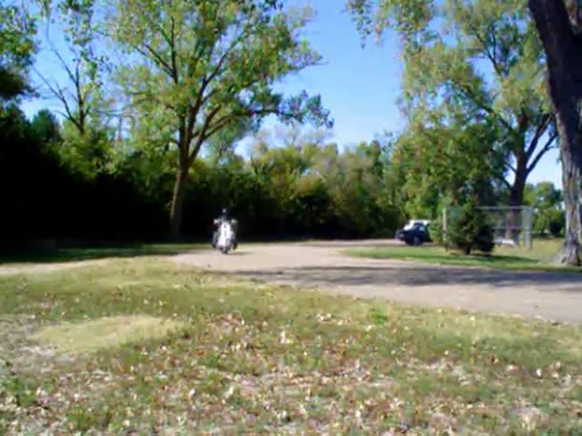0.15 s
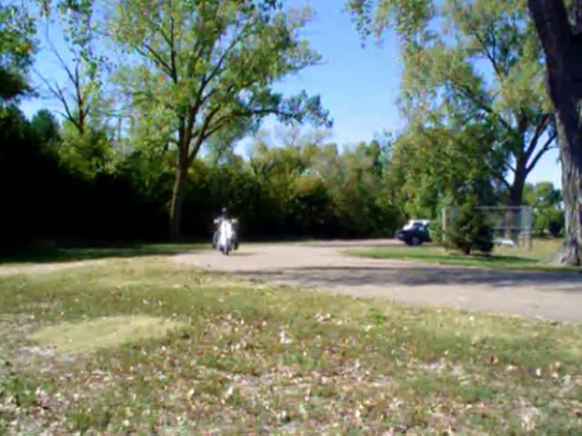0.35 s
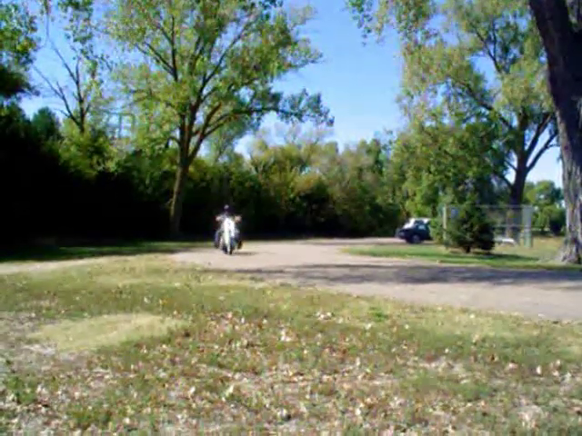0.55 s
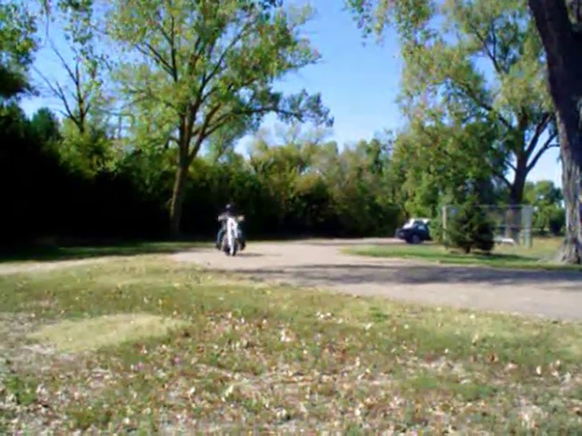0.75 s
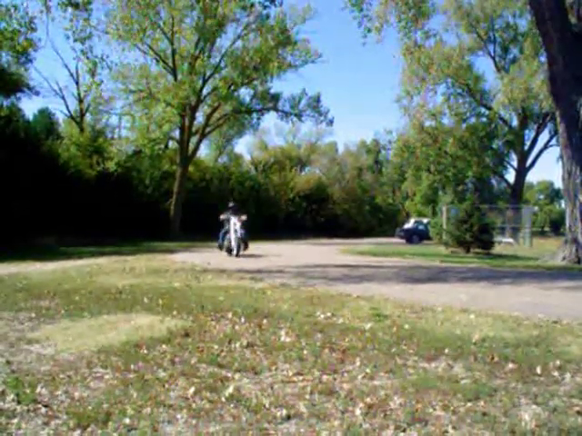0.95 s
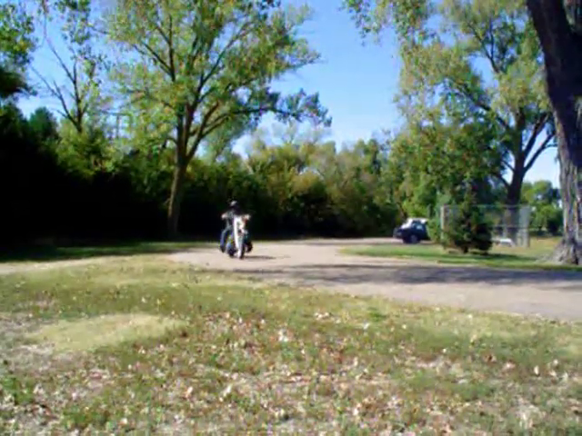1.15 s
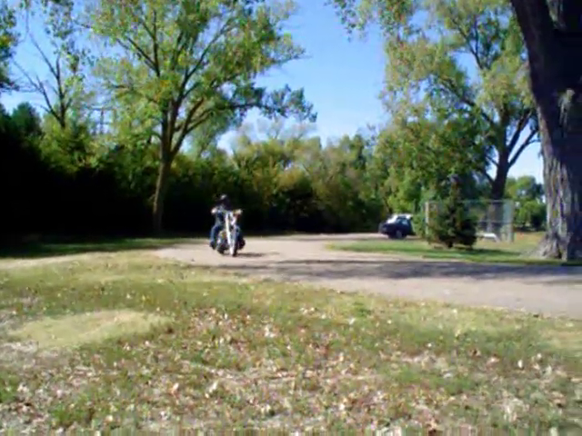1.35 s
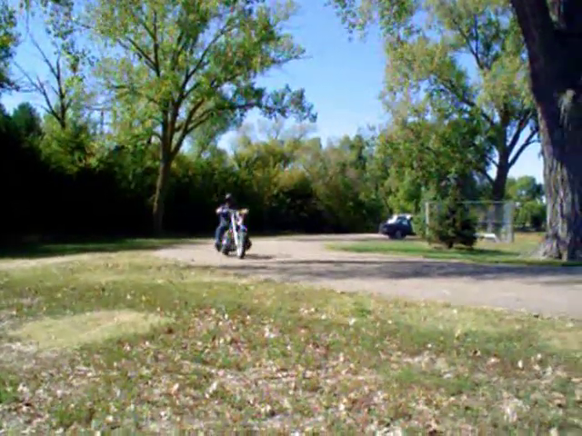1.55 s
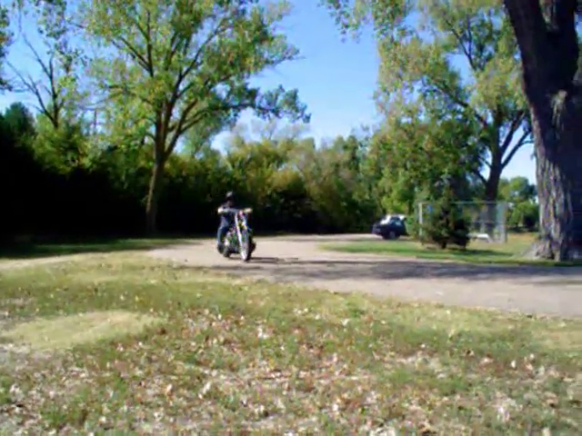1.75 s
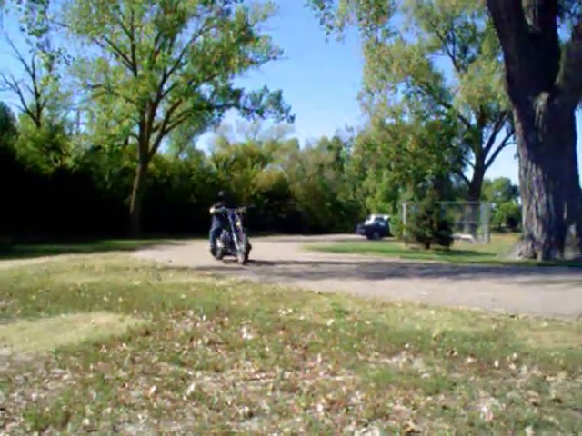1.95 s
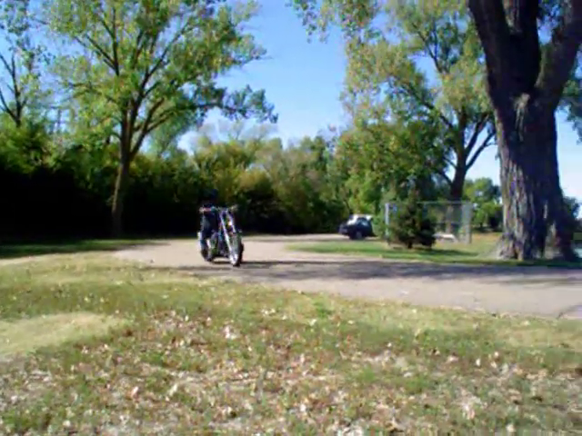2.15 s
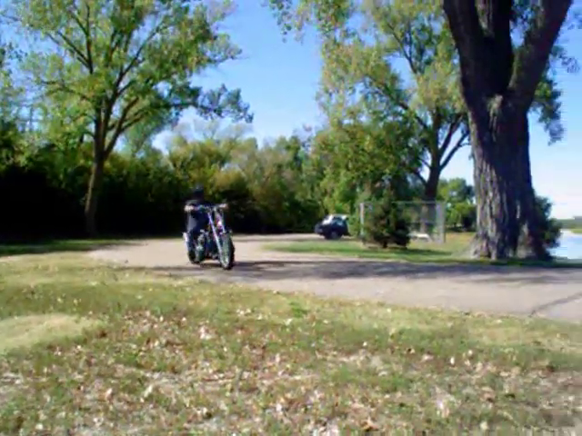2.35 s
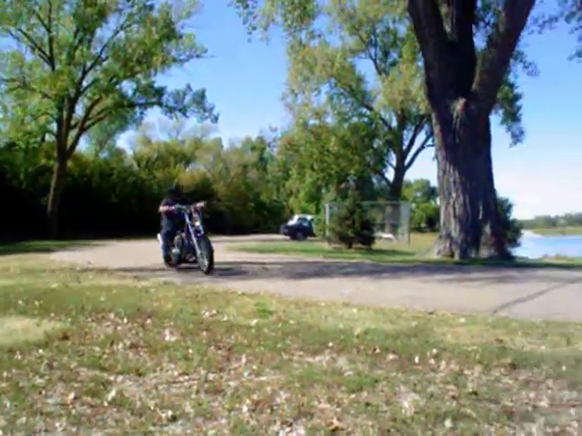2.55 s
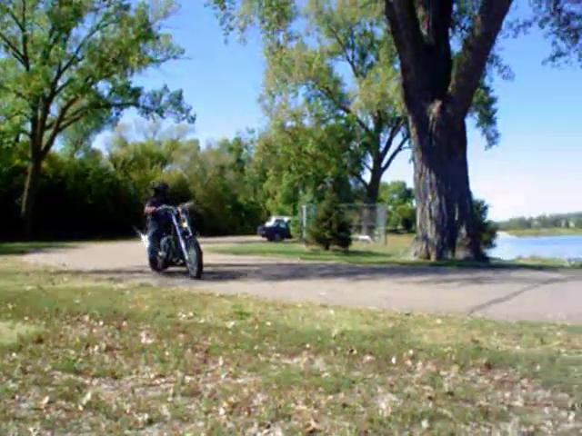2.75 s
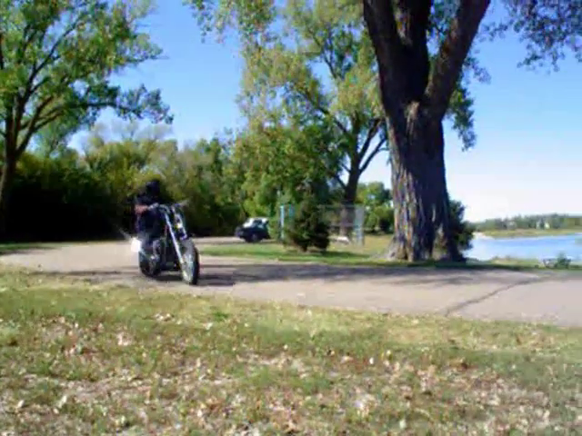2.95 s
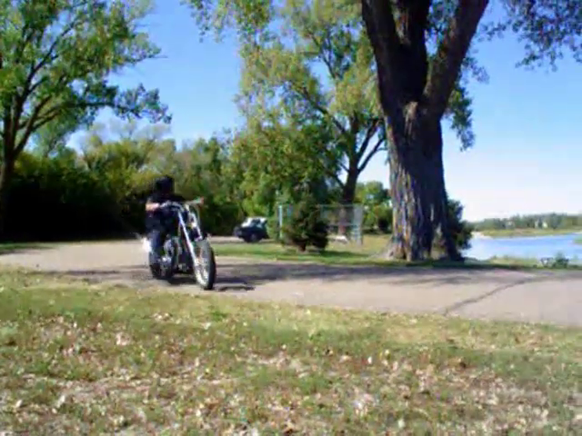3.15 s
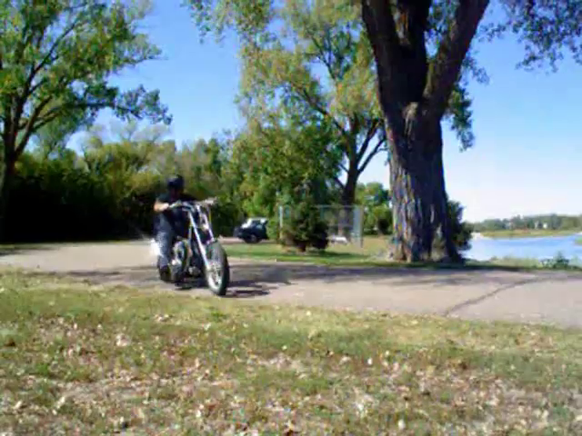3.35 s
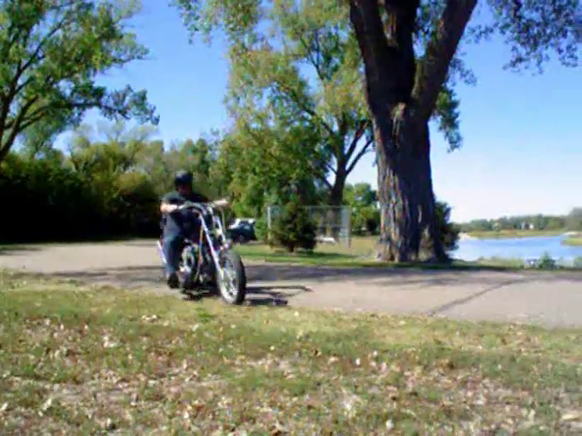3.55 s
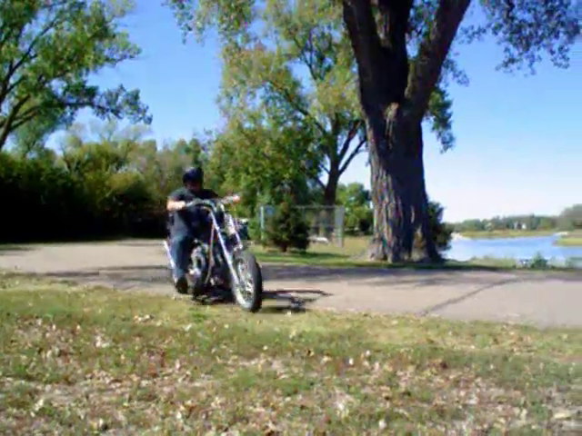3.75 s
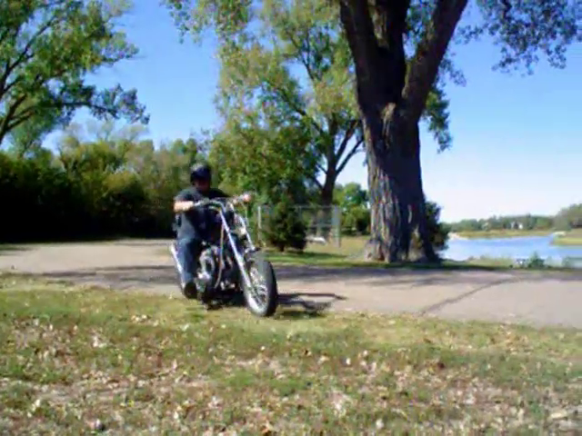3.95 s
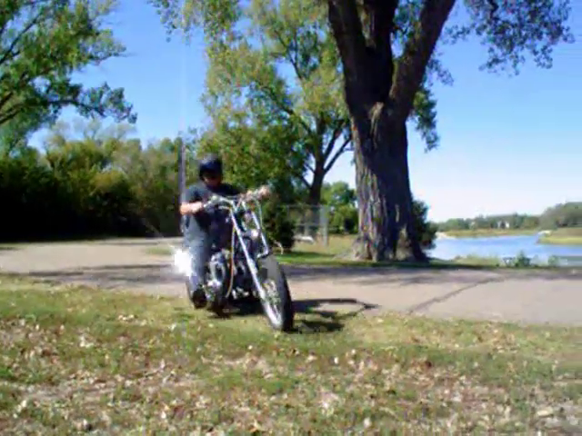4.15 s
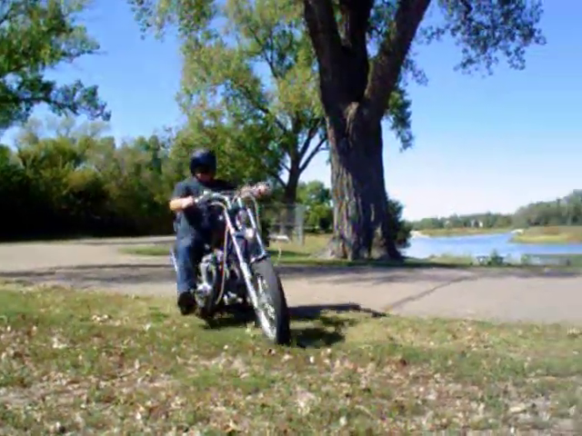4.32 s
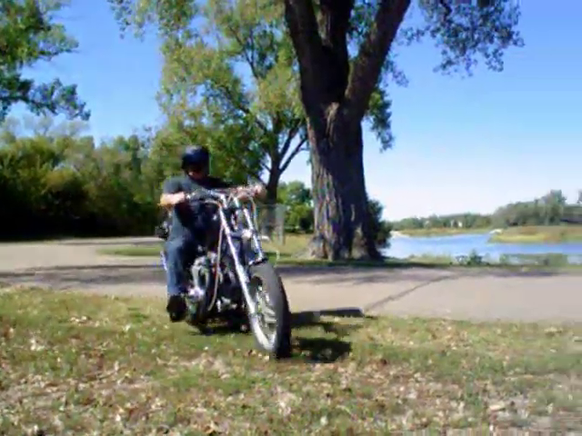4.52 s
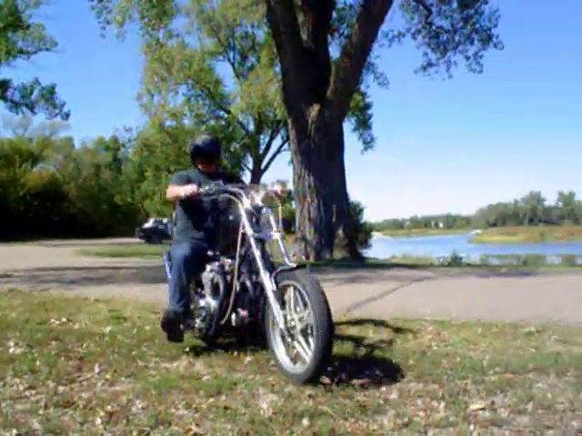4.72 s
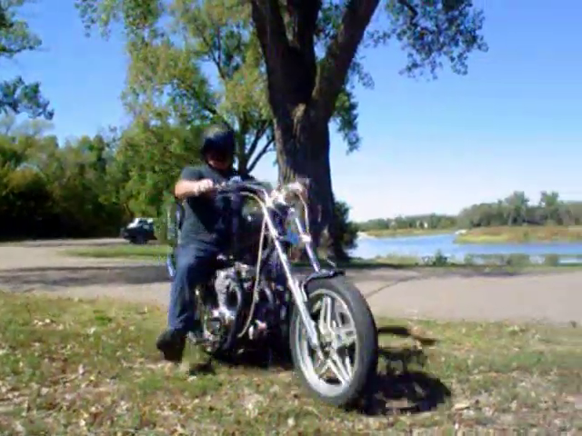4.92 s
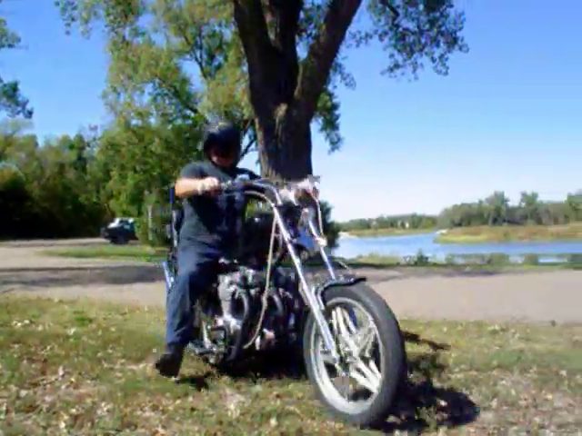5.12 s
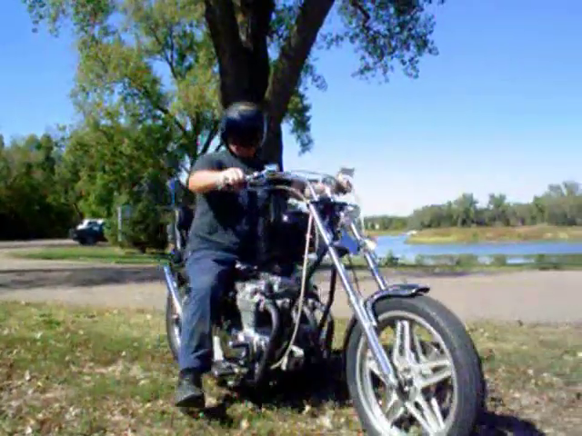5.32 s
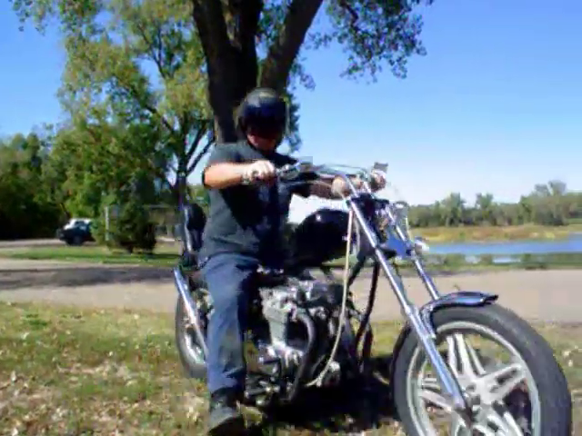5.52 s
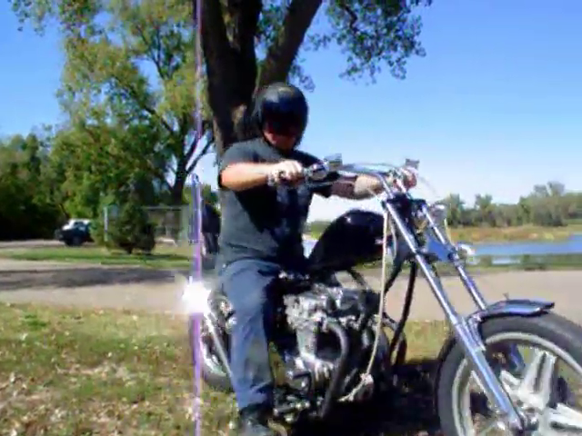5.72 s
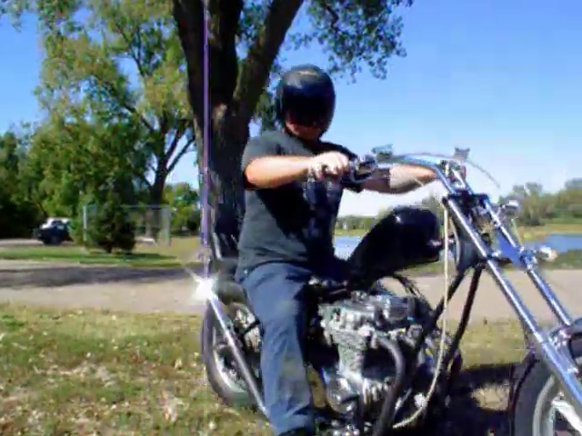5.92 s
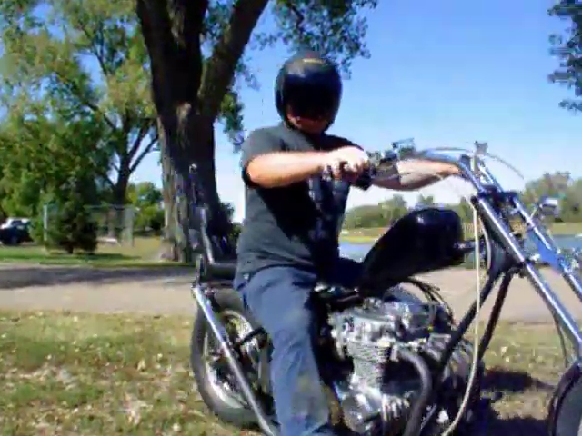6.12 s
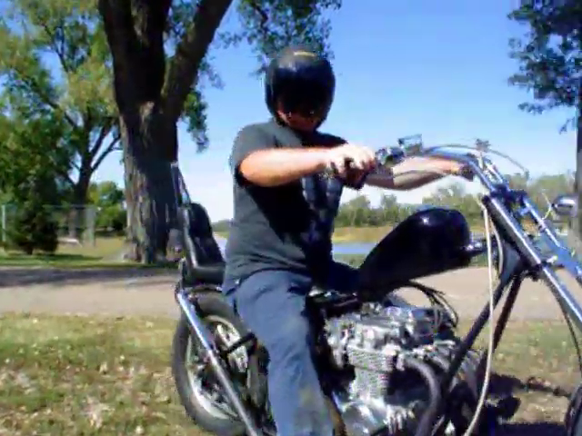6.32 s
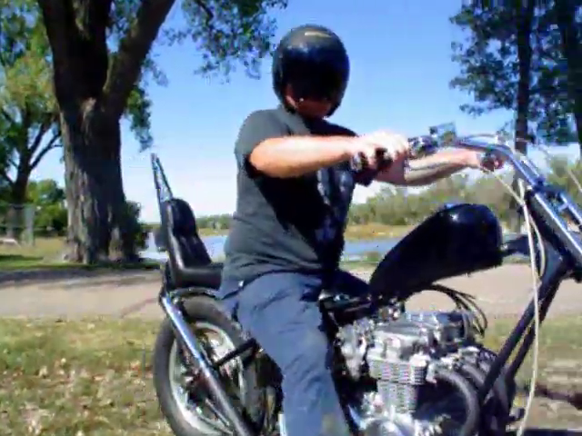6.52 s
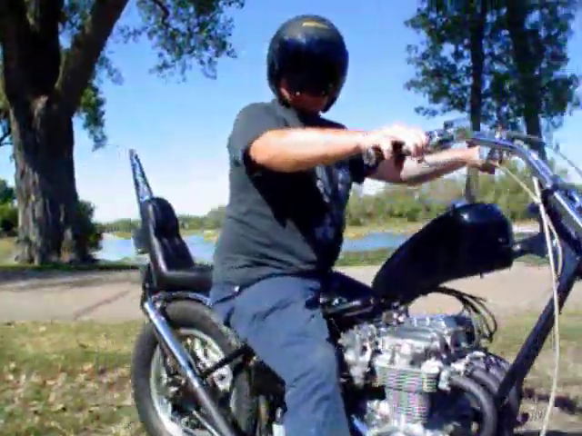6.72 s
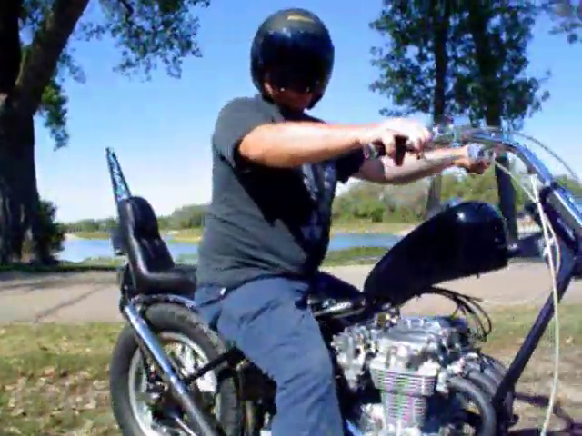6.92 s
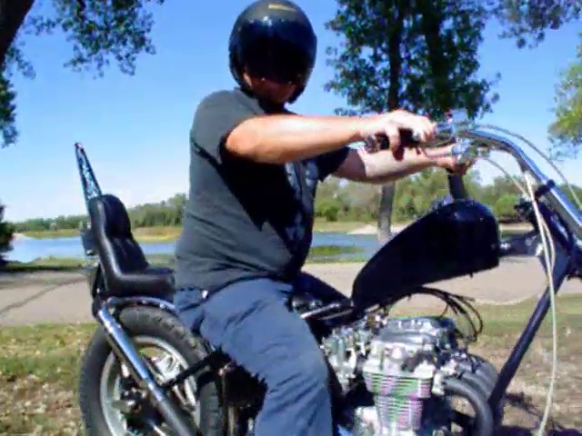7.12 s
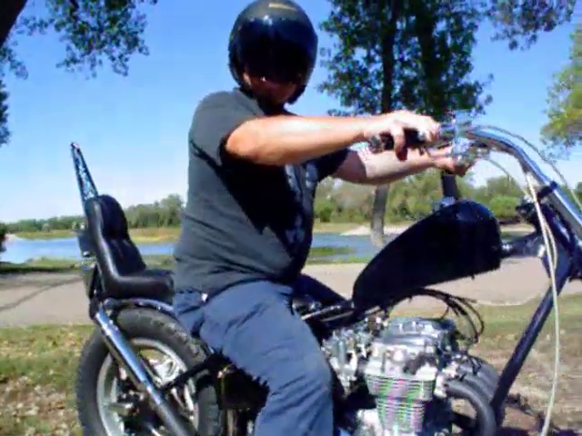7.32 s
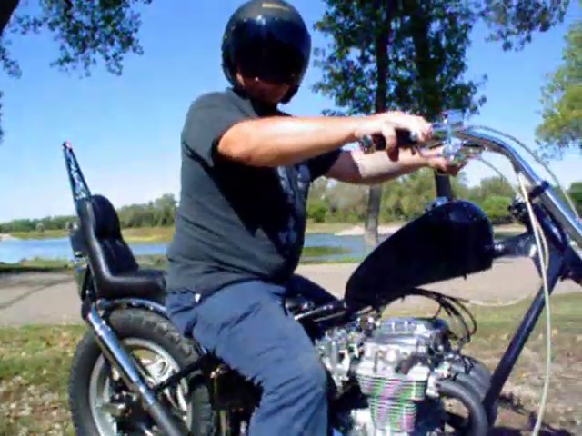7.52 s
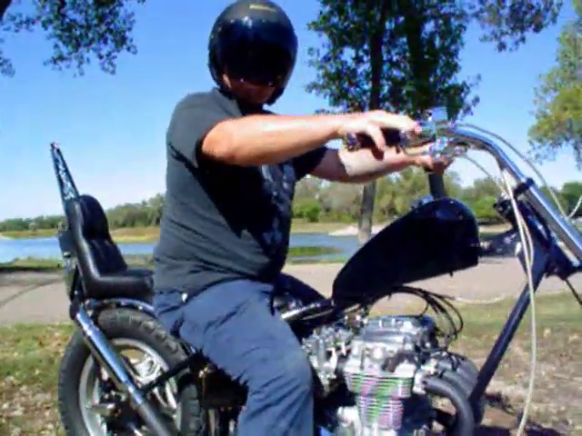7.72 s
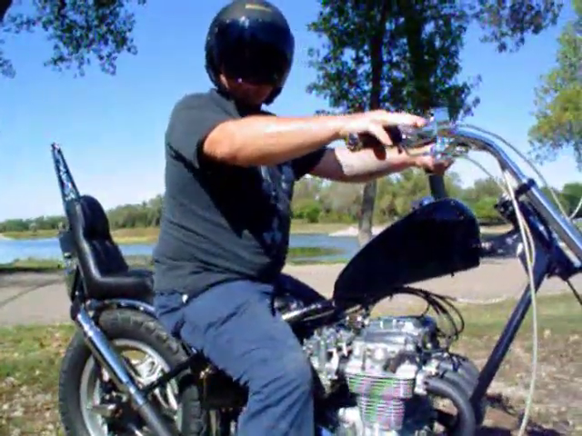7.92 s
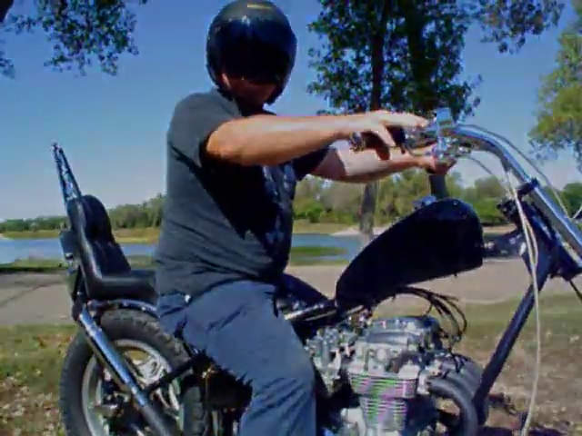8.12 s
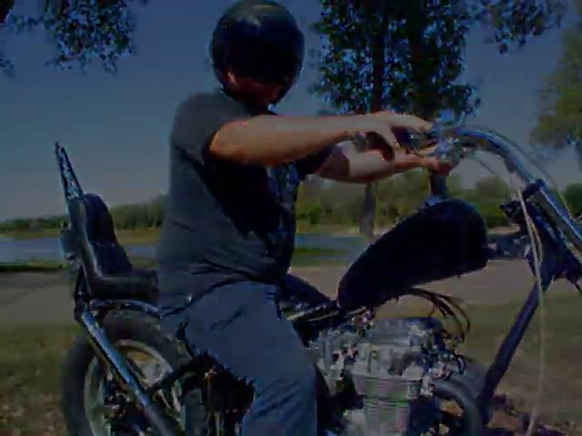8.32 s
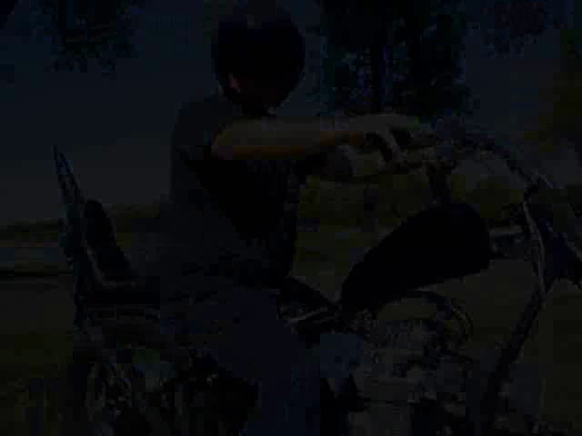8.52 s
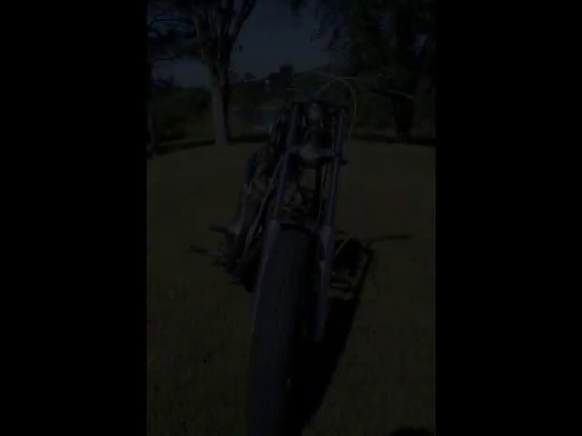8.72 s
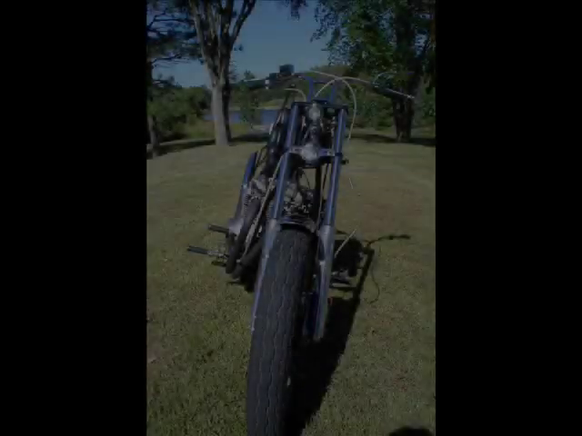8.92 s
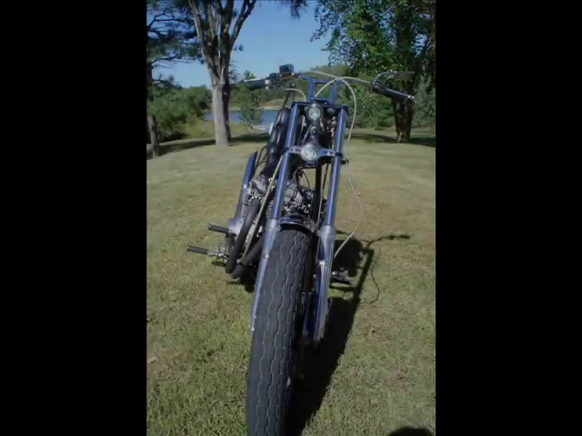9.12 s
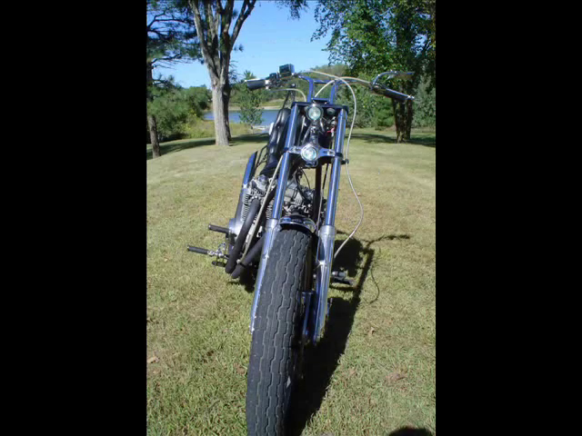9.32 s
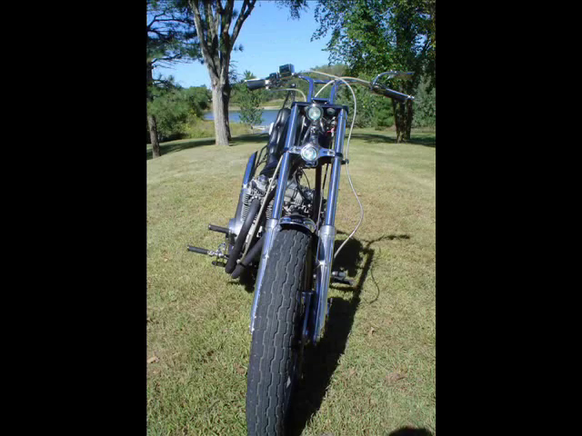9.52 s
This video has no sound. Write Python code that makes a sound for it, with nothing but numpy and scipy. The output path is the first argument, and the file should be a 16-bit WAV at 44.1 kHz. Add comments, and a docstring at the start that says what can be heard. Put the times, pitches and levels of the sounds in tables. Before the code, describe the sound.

Outdoors among trees, a motorcycle approaches the microphone from afar, its raspy engine note falling steadily as it slows. About halfway through, the tyres crackle over dry leaves and twigs and the bike gives a couple of light knocks. The engine settles into a loud, loping idle close by, with ticking valves and a metallic rattle over the booming exhaust, and is still running at the sudden end.

```python
"""Chopper rolling up a park lane.

A four-cylinder bike nears over dry leaves and twigs, then idles close by until the sound is cut.
Uneven firings ring the open pipes and echo from the trees; at idle one header honks once a cycle.
Valve gear and chain clatter ring the engine cases as it comes close. A faint breeze rumbles."""
import sys
import numpy as np
from scipy import signal
from scipy.fft import rfft, irfft
from scipy.io import wavfile
from scipy.ndimage import uniform_filter1d, map_coordinates

SR = 44100
rng = np.random.default_rng(int(sys.argv[2]) if len(sys.argv) > 2 else 0)


def int16_out(signal):
    """Quantize to a 16-bit WAV file."""
    q = np.round(np.clip(np.atleast_2d(signal).T, -1, 1) * 32767)
    wavfile.write(sys.argv[1], SR, q.astype(np.int16))


N = 426006
TIME_S = np.arange(N) / SR
BINS_HZ = np.maximum(np.fft.rfftfreq(8192, 1 / SR), 1)

# air rumble: freq_hz, density_db
BREEZE_SPECTRUM = [(12, -17.5), (40, -7), (90, 2), (200, -25.5), (800, -52)]
# leaves under the tyres: time_s, level_db
LEAF_LEVEL = [(4.25, -51), (4.42, -33), (4.68, -76), (4.9, -39.5), (5.25, -35), (5.6, -38.5), (6.3, -32),
              (6.6, -69)]
# twigs and leaves snapping: start_s, level_db, decay_s, crisp_share
SNAPS = [(4.4176, -24, .009, 0.4), (4.43, -24, 0.012, 0.35), (4.514, -19, 0.01, 0.48),
         (4.612, -24, .01, 0.5), (4.6422, -22.5, 0.013, 0.1), (4.6594, -23.5, .012, .3),
         (4.712, -15.5, 0.0079, 0.1), (4.7547, -26.5, 0.014, 0.2), (5.035, -25.5, 0.013, 0.3),
         (5.393, -16, 0.01, 0.3), (5.442, -22, 0.0051, .2), (5.575, -17, .01, 0.3),
         (5.601, -17.5, 0.0027, 0.5), (5.615, -25, 0.0064, 0), (5.8657, -26, 0.01, 0.3),
         (5.9315, -25, 0.0073, 0.3), (6.0878, -18, 0.01, 0.86), (6.2633, -21, 0.014, 0.6),
         (7.06, -21, .012, 0.4), (8.692, -12.5, 0.0025, 0.76)]
# breaking wood and leaves: freq_hz, density_db
TWIG_SPECTRUM = [(700, -20.5), (2000, 7), (4500, 0.5), (6500, 1), (9500, -2.5), (10800, -18.5),
                 (16000, -11.5)]
# gearbox and frame knocks: start_s, level_db, decay_s, bright_share
KNOCKS = [(0.631, -25, 0.007, 0.12), (2.79, -26.5, 0.014, .01), (4.712, -20.5, 0.012, 0.5),
          (4.7212, -16, 0.0018, 0.6), (5.255, -12, 0.0034, 0.75), (5.292, -14, 0.0014, 0.3),
          (8.6575, -9, 0.0035, 0.55), (8.6612, -10, 0.0016, 0.4)]
# dull part of a knock: freq_hz, density_db
KNOCK_SPECTRUM = [(200, -11), (700, 7), (970, 22.5), (1090, 9.5), (1260, 25.5), (1550, 6.5), (3500, -11.5),
                  (6000, -21), (12000, -16.5)]
# engine clatter, far and near: freq_hz, density_db
FAR_CLATTER_SPECTRUM = [(410, -12.5), (700, -4), (830, -1.5), (958, -5), (1120, -2.5), (1500, -9),
                        (1710, -3.5), (2300, -7.5), (2840, -7), (3500, -13), (8420, -20), (9600, -23),
                        (10900, -28.5), (15200, -27), (16000, -27)]
NEAR_CLATTER_SPECTRUM = [(300, -12), (600, 1.5), (800, 1), (1200, 3.5), (1550, 0), (2100, 1.5), (2650, 3.5),
                         (3200, -2), (5000, -5.5), (6500, -11.5), (9500, -12.5), (10600, -22.5),
                         (13500, -21.5), (15500, -19)]
# finned engine case, side covers: freq_hz, width_hz, gain_db
CASE_MODES = [(1185, 60, -9), (2085, 55, -9), (2530, 45, -5), (2735, 70, -6), (2798, 30, 2), (2880, 25, -6),
              (3017, 30, -10), (4985, 45, -8), (7350, 70, -20), (9280, 70, -20), (14900, 40, -16)]
COVER_MODES = [(760, 38, -8), (838, 22, 0.5), (989, 27, 3.5), (1120, 20, -3.5), (1986, 52, -4)]
# singing fins: pitch_hz, level_db
FIN_TONES = [(2798, 1.5), (4987, -15), (14900, -21)]
# upper pipe resonances: freq_hz, width_hz, gain_db
OVERTONE_MODES = [(445, 65, -5.5), (585, 83, -1.5), (667, 50, -7.5)]
# pipe overtones: time_s, level_db
OVERTONE_LEVEL = [(0, -35), (.65, -33.5), (.8, -40), (1.0, -37.5), (2.4, -39.5), (3.4, -44), (4.5, -60)]
# honking header: freq_hz, width_hz, gain_db
HONK_MODES = [(464.8, 19, -3), (398, 51, -12), (560, 80, -16.5), (680, 100, -22)]
# its puffs in one engine cycle: offset_firings, level_db
HONK_PUFFS = [(1.1, -12), (2.07, 0), (2.5, -4.5), (3.1, -3)]
# pipes from afar and from the side: freq_hz, width_hz, gain_db
FAR_PIPE_MODES = [(55, 110, -35), (127.5, 20, 15.5), (153, 21, 14.5), (263, 47, -18.5), (323, 160, -22.5),
                  (453, 120, -2), (578.6, 35, -14.5), (673, 29, -17.5), (961, 77, -26.5)]
NEAR_PIPE_MODES = [(38, 24, -27.5), (78, 50, -37.5), (117, 19, -4.5), (146, 15, -1), (184, 24, -10),
                   (216, 28, -7), (246, 30, -9.5), (283, 24, -8.5), (350, 24, -19), (390, 36, -15),
                   (475, 110, -15), (555, 60, -17.5), (680, 170, -21)]
# cylinders in firing order:
# idle_boom_db, idle_body_db, idle_bark_db, idle_late_s, coast_db, coast_late_s, header_round_trip_s
CYLINDERS = [(-4, 6, -6, -.0004, 5, .0001, .0042), (8.5, 4.5, 5, .0028, -10.5, -.0005, .00335),
             (-4.5, 2.5, -7.5, .0018, 6.5, .0016, .0021), (4, -6, -5.5, .0008, -1.5, .0009, 0.0039)]
# engine speed: time_s, firing_hz
FIRING_RATE = [(0.0, 73.3), (.28, 73.4), (.37, 75.3), (.44, 73), (.61, 76.2), (.8, 71), (.9, 71),
               (1.0, 73.5), (1.12, 71), (1.45, 69.2), (1.6, 65.21), (2.09, 61.98), (2.59, 60.75),
               (2.98, 55.93), (4.07, 46.24), (4.35, 46.66), (4.53, 42.17), (5.26, 39.88), (5.92, 40.57),
               (6.03, 38.94), (7.37, 38.81), (7.53, 36.75), (8.75, 39.21)]
# approach: time_s, nearness (0-1)
APPROACH = [(0, 0.01), (1.2, 0), (2.8, 0.21), (4.2, 0.28), (4.9, 0.51), (5.4, 0.78), (6.1, 0.85),
            (6.5, 0.95), (7.1, .99), (8.7, 0.97)]
# throttle: time_s, coasting (1 = shut)
COASTING = [(0, 0.27), (.68, 0.41), (.78, 1), (1.3, 0.58), (1.55, 1), (2.85, 0.68), (3.3, 0.48),
            (4.4, 0.21), (4.95, 0.72), (5.8, 0.6)]

# levels over the approach: far_db, near_db, nearness_power
THUD_LEVEL, BOOM_LEVEL = (-49, -38.5, 0.89), (-30, -16.5, 0.64)
BODY_LEVEL, BARK_LEVEL = (-35.5, -25.5, 0.17), (-33, -27.5, 22)
HONK_LEVEL, CLATTER_LEVEL = (-47.5, -24.5, 6.5), (-41, -26.5, 1.0)
ECHO_LEVEL = (-1.2, -3.8, 17)  # relative to the pipes
RING_LEVEL = (-12.5, 1.5, 7.1)  # cases, relative to CLATTER_LEVEL


def undb(db):
    """Decibels to gain."""
    return 10 ** (np.asarray(db) / 20)


def curve(table):
    """A (time_s, value) table, sample by sample."""
    return np.interp(TIME_S, *np.transpose(table))


def approach_db(level, near):
    """Level at a nearness; a high power arrives late."""
    far_db, near_db, power = level
    return far_db + (near_db - far_db) * near ** power


def unit(x):
    """Scale to rms 1."""
    return x / np.sqrt(np.mean(x ** 2))


def steady(x, span_s=.21):
    """Hold the slow level at 1, keep the throb."""
    span = int(span_s * SR)
    return x / np.sqrt(uniform_filter1d(uniform_filter1d(x ** 2, span), span) + 1e-12)


def wander(rate_hz):
    """Random straight-line drift, spread near 1."""
    return np.interp(TIME_S * rate_hz, np.arange(600), rng.standard_normal(600))


def slope(spectrum):
    """Gain per bin from (freq_hz, density_db) points."""
    hz, db = np.transpose(spectrum)
    return undb(np.interp(np.log(BINS_HZ), np.log(hz), db))


def resonances(modes):
    """Gain per bin of resonant peaks."""
    return sum(undb(db) / (1 + (2 * (BINS_HZ - hz) / width_hz) ** 2) for hz, width_hz, db in modes)


def colour(x, gain):
    """Minimum-phase filter of unit power, shaped by a gain per bin."""
    cepstrum = irfft(np.log(gain))
    cepstrum[1:len(gain) - 1] *= 2
    cepstrum[len(gain):] = 0
    response = irfft(np.exp(rfft(cepstrum)))
    return signal.oaconvolve(x, response / np.linalg.norm(response))[:N]


def band(x, low_hz, high_hz):
    """Second-order band-pass."""
    return signal.sosfilt(signal.butter(2, [low_hz, high_hz], "band", fs=SR, output="sos"), x)


def below(x, hz):
    """Zero-phase low-pass."""
    return signal.sosfiltfilt(signal.butter(6, hz, fs=SR, output="sos"), x)


def decaying(x, decay_s):
    """Give each impulse an exponential tail."""
    return signal.lfilter([1], [1, -np.exp(-1 / (decay_s * SR))], x)


def clicks(times_s, sizes):
    """One impulse at each time."""
    return np.bincount(np.clip(times_s * SR, 0, N - 1).astype(int), sizes, N)


def burst(start_s, decay_s, grain_db=4):
    """Grainy noise: instant attack, exponential decay."""
    age_s = np.arange(SR // 5) / SR
    noise, grain = rng.standard_normal((len(age_s), 2)).T
    grains = unit(noise * undb(grain_db * grain)) * np.exp(-age_s / decay_s)
    return np.pad(grains, (int(start_s * SR), N))[:N]


def breeze(near, level_db=-57, stirred_db=8):
    """Air rumbles faintly, more with the bike close."""
    return undb(level_db + stirred_db * near) * colour(rng.standard_normal(N), slope(BREEZE_SPECTRUM))


def leaves_and_twigs(crumbs_per_s=250, fibres_per_s=900, fibre_db=5, snap_gain_db=1, crisp_gain_db=4):
    """Leaves crumble and twigs crack under tyres and boots, fibre by fibre; thin ones snap higher."""
    chance, size = rng.random((N, 2)).T
    crumbs = (chance < crumbs_per_s / SR) * undb(-3 * np.log(size + 0.015))
    crumble = unit(signal.lfilter([1], [1, -.97], crumbs) * rng.standard_normal(N))
    leaves = undb(curve(LEAF_LEVEL)) * crumble
    fibres = unit(undb(fibre_db * rng.uniform(-1, 1, N))[(TIME_S * fibres_per_s).astype(int)])
    woody, thin = 0, 0
    for start_s, level_db, decay_s, crisp in SNAPS:
        snap = undb(level_db + snap_gain_db) * fibres * burst(start_s, decay_s)
        woody += (1 - crisp) * snap
        thin += crisp * snap
    return colour(woody + leaves, slope(TWIG_SPECTRUM)) + undb(crisp_gain_db) * band(thin, 6000, 9400)


def knocks(sharp_gain_db=11):
    """Gearbox and frame clunk; harder blows ring higher."""
    dull, sharp = 0, 0
    for start_s, level_db, decay_s, bright in KNOCKS:
        blow = undb(level_db) * burst(start_s, decay_s)
        dull += (1 - bright) * blow
        sharp += bright * blow
    return colour(dull, slope(KNOCK_SPECTRUM)) + undb(sharp_gain_db) * band(sharp, 1500, 4500)


def metal_ring(shaking, modes):
    """Each mode rings on its own noise, scaled by the shaking."""
    ring = 0
    for hz, width_hz, db in modes:
        resonator = signal.iirpeak(hz, hz / width_hz, SR)
        ring += undb(db) * signal.lfilter(*resonator, shaking * rng.standard_normal(N))
    return ring


def fin_whine(shaking, clock_s, smooth_s=.009, slip_rad=1.0, slip_rate_hz=25):
    """Lightly damped fins sing on between taps and flicker with each."""
    flicker = unit(uniform_filter1d(shaking, int(smooth_s * SR)))
    return flicker * sum(undb(db) * np.sin(2 * np.pi * hz * clock_s + slip_rad * wander(slip_rate_hz))
                         for hz, db in FIN_TONES)


def engine_cases(shaking, drift_s=.00015, drift_rate_hz=5):
    """Shaken cases and fins ring, wavering slightly in pitch."""
    clock_s = TIME_S + drift_s * wander(drift_rate_hz)
    ring = map_coordinates(metal_ring(shaking, CASE_MODES), [clock_s * SR], mode="mirror")
    return unit(ring) + fin_whine(shaking, clock_s)


def tappets(firings, offset_firings=.72, jitter_s=0.0016, scatter_db=4, decay_s=0.0028):
    """Envelope of the valve gear: one tap per firing."""
    times_s = np.interp(np.arange(int(firings[-1])) + offset_firings, firings, TIME_S)
    timing, force = rng.uniform(-0.87, 1, (len(times_s), 2)).T
    taps = clicks(times_s + jitter_s * timing, undb(scatter_db * force))
    return unit(decaying(taps, decay_s))


def clatter(firings, near, swell_db=0.62, swell_peak_cycles=.6, links_per_s=800, link_db=1.5):
    """Tappets tick over chain and gear rattle that swells once a cycle; cases and covers ring along."""
    taps = tappets(firings)
    swell = undb(swell_db * np.cos(2 * np.pi * (firings / len(CYLINDERS) - swell_peak_cycles)))
    links = undb(link_db * rng.standard_normal(N))[(TIME_S * links_per_s).astype(int)]
    chain = unit(swell * links)
    drive = np.hypot(chain, undb(-9) * taps) * rng.standard_normal(N)
    far_rattle = undb(3.5) * unit(colour(swell * rng.standard_normal(N), slope(FAR_CLATTER_SPECTRUM)))
    near_rattle = undb(3) * unit(colour(drive, slope(NEAR_CLATTER_SPECTRUM)))
    rattle = np.sqrt(1 - near) * far_rattle + np.sqrt(near) * near_rattle
    shaking = np.hypot(taps, undb(-6) * chain)
    cases = undb(approach_db(RING_LEVEL, near)) * unit(engine_cases(shaking))
    covers = undb(-9) * unit(metal_ring(shaking, COVER_MODES))
    return undb(approach_db(CLATTER_LEVEL, near)) * (rattle + cases + covers)


def pipe_overtones(firings, firing_hz):
    """Upper firing harmonics sing as they glide through the pipe resonances."""
    gain = resonances(OVERTONE_MODES)
    tone = sum(np.interp(k * firing_hz, BINS_HZ, gain) * np.sin(2 * np.pi * k * firings)
               for k in range(5, 14))
    return undb(curve(OVERTONE_LEVEL)) * tone


def header_honk(firings, near, scatter_db=1.5, jitter_s=0.0006):
    """One header honks in a short run of puffs each engine cycle: the lope of the idle."""
    cycle_starts = np.arange(0, firings[-1], len(CYLINDERS))
    puffs = 0
    for offset_firings, level_db in HONK_PUFFS:
        timing, force = rng.standard_normal((len(cycle_starts), 2)).T
        times_s = np.interp(cycle_starts + offset_firings, firings, TIME_S) + jitter_s * timing
        puffs += clicks(times_s, undb(level_db + scatter_db * force))
    return undb(approach_db(HONK_LEVEL, near)) * steady(colour(puffs, resonances(HONK_MODES)))


def tree_echo(x, near, t60_s=1.0, gap_s=0.006, paths=4, far_fade_hz=4):
    """Ground and trunks scatter the sound; paths fade in and out as the bike travels."""
    travel_cycles = np.cumsum(far_fade_hz * (1 - near ** 2)) / SR
    age_s = np.arange(SR) / SR
    onset = np.clip(age_s / gap_s - 1, 0, 1)
    tails = rng.standard_normal((paths, SR)) * undb(-60 * age_s / t60_s) * onset
    echo = 0
    for k, tail in enumerate(tails):
        fade = np.cos(2 * np.pi * travel_cycles * (k + 1) / paths + k)
        echo += fade * signal.oaconvolve(x, tail / np.linalg.norm(tail))[:N]
    return np.sqrt(2 / paths) * echo


def gas_rush(fronts, share, decay_s):
    """A puff of turbulent gas follows each pressure front."""
    return fronts + share * rng.standard_normal(N) * decaying(abs(fronts), decay_s)


def pressure_fronts(firings, idle, coast, jitter_s=0.0001, rough_jitter_s=0.00024, bark_scatter_db=0.74):
    """Boom, body and bark impulses per firing; off the throttle the cylinders fire unequally."""
    number = np.arange(1, int(firings[-1]))
    times_s = np.interp(number, firings, TIME_S)
    idle, coast = np.interp(times_s, TIME_S, idle), np.interp(times_s, TIME_S, coast)
    cylinder = np.array(CYLINDERS)[(number - 1) % len(CYLINDERS)]
    *idle_bands_db, idle_late_s, coast_db, coast_late_s, round_trip_s = cylinder.T
    timing, burn, edge = rng.standard_normal((len(number), 3)).T
    spread_s = jitter_s + np.maximum(idle, 0.7 * coast) * rough_jitter_s
    times_s = times_s + idle * idle_late_s + coast * coast_late_s + spread_s * timing
    unrest = np.sqrt(0.053 + idle + 0.69 * coast)
    burn_db = coast * coast_db + unrest * burn
    fronts = []
    for idle_db, edge_share in zip(idle_bands_db, (0, .5, 1)):
        size = undb(burn_db + idle * idle_db + edge_share * bark_scatter_db * edge)
        reflection = clicks(times_s + round_trip_s, 0.3 * unrest * size)
        fronts.append(clicks(times_s, size) - reflection)  # inverted at the header's end
    return fronts


def firing_pulses(firings, idle, coast):
    """Fronts plus gas, joined across three bands; at idle the gas leaves slowly and chugs merge."""
    boom, body, bark = pressure_fronts(firings, idle, coast)
    boom = gas_rush(boom, share=0.015 * idle, decay_s=0.014)
    body = gas_rush(body, share=0.015 * idle, decay_s=0.014)
    bark = gas_rush(bark, share=0.028 + 0.022 * idle, decay_s=0.011)
    return below(boom - body, hz=185) + below(body - bark, hz=350) + bark


def pipes(pulses, firing_hz, near, rasp_db_per_hz=0.24, rasp_pivot_hz=58.4, low_cut_hz=26):
    """Open pipes ring: raspier with speed from the front, changing voice as the bike turns side-on."""
    low_cut = BINS_HZ ** 2 / (BINS_HZ ** 2 + low_cut_hz ** 2)
    far_voice = colour(pulses, low_cut * resonances(FAR_PIPE_MODES))
    near_voice = colour(pulses, low_cut * resonances(NEAR_PIPE_MODES))
    side_on = near ** 1.6
    voice = (1 - side_on) * far_voice + side_on * near_voice
    rasp_db = rasp_db_per_hz * (firing_hz - rasp_pivot_hz) * (1 - near ** 3.7)
    treble = voice - below(voice, hz=540)
    return voice + (undb(rasp_db) - 1) * treble


def boom_swell_db(firing_hz, pipe_hz=147.4, width_hz=8.5, peak_db=4):
    """The boom swells when firing harmonic 2 or 3 meets the pipes' note."""
    return peak_db * sum(np.exp(-((k * firing_hz - pipe_hz) / width_hz) ** 2) for k in (2, 3))


def exhaust(firings, firing_hz, near, idle, coast, coast_boom_db=-8, coast_echo_db=2):
    """Firings ring the pipes and echo; thud, boom, body and bark bands are levelled separately."""
    voice = pipes(firing_pulses(firings, idle, coast), firing_hz, near)
    # under throttle most bass stays clear of the echo
    clear_share = (0.78 * (1 - idle) + .62 * idle) * (1 - coast ** 3)
    echo = tree_echo(voice - clear_share * below(voice, hz=200), near)
    voice = voice + undb(approach_db(ECHO_LEVEL, near) + coast_echo_db * coast) * echo
    sub, bass, lows = (below(voice, hz) for hz in (85, 190, 330))
    boom_db = approach_db(BOOM_LEVEL, near) + boom_swell_db(firing_hz) + coast_boom_db * coast
    thud = undb(approach_db(THUD_LEVEL, near)) * steady(sub)
    boom = undb(boom_db) * steady(bass - sub)
    body = undb(approach_db(BODY_LEVEL, near)) * steady(lows - bass)
    bark = undb(approach_db(BARK_LEVEL, near)) * steady(voice - lows)
    return thud + boom + body + bark


def crankshaft(firing_hz, idle, start_firings=.68, hunt_firings=.045, hunt_rate_hz=5):
    """Running count of firings; the crank hunts ahead and behind, more at idle."""
    hunt = hunt_firings * wander(hunt_rate_hz) * (1 + idle) / 2
    return start_firings + np.cumsum(firing_hz) / SR + hunt


def scene(idle_below_hz=45.93, idle_spread_hz=2.2):
    """The crankshaft times exhaust and clatter; speed, throttle and nearness set their levels."""
    firing_hz = curve(FIRING_RATE)
    near, coast = np.clip([curve(APPROACH), curve(COASTING)], 0, 1)
    idle = 1 / (1 + np.exp((firing_hz - idle_below_hz) / idle_spread_hz))
    firings = crankshaft(firing_hz, idle)
    bike = exhaust(firings, firing_hz, near, idle, coast) + pipe_overtones(firings, firing_hz)
    bike += header_honk(firings, near) + clatter(firings, near) + knocks()
    return (bike + leaves_and_twigs() + breeze(near))[None]


def record(dry, stop_s=8.745, dc_block_hz=.8, top_hz=15850):
    """Dead stop, DC block, steep low-pass."""
    dc_block = signal.butter(1, dc_block_hz, "high", fs=SR, output="sos")
    low_pass = signal.ellip(10, .2, 80, top_hz, fs=SR, output="sos")
    return signal.sosfilt(low_pass, signal.sosfilt(dc_block, dry * (TIME_S < stop_s)))


dry = scene()
out = record(dry)
int16_out(out)
```